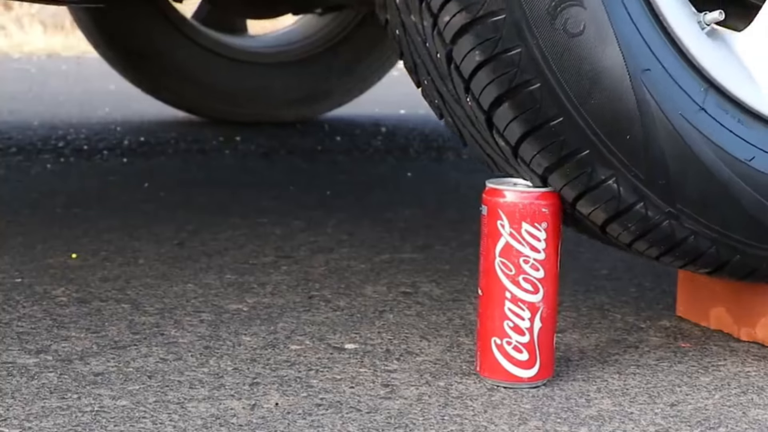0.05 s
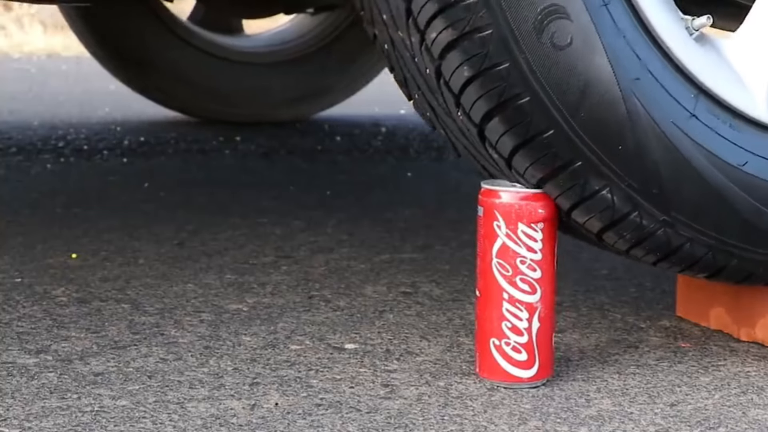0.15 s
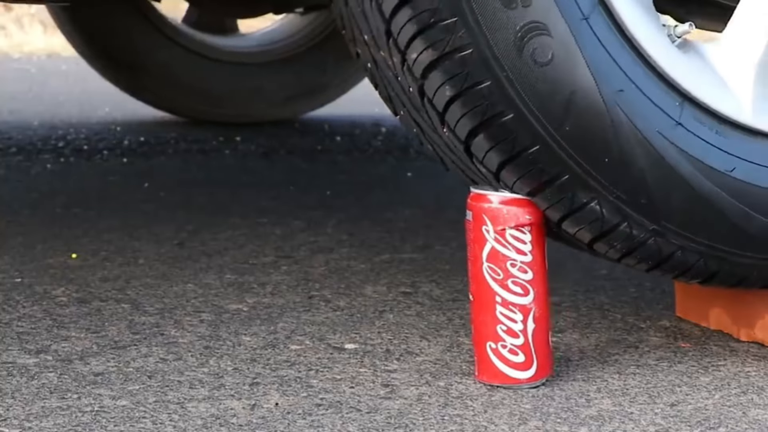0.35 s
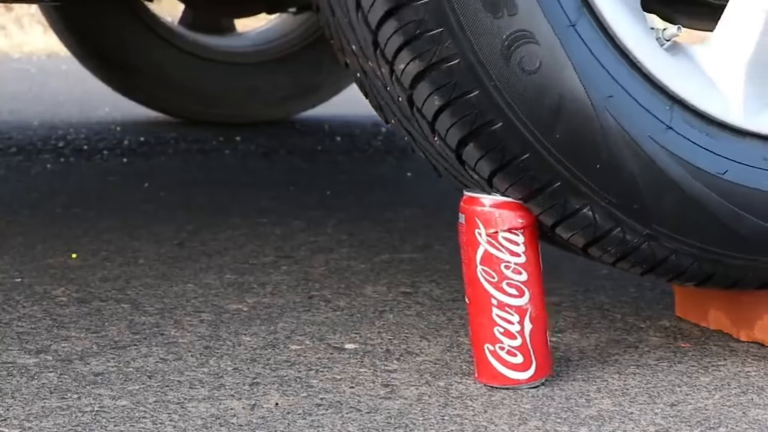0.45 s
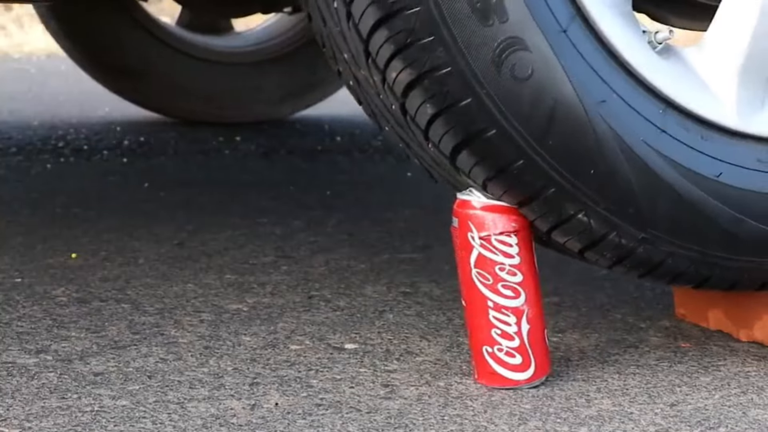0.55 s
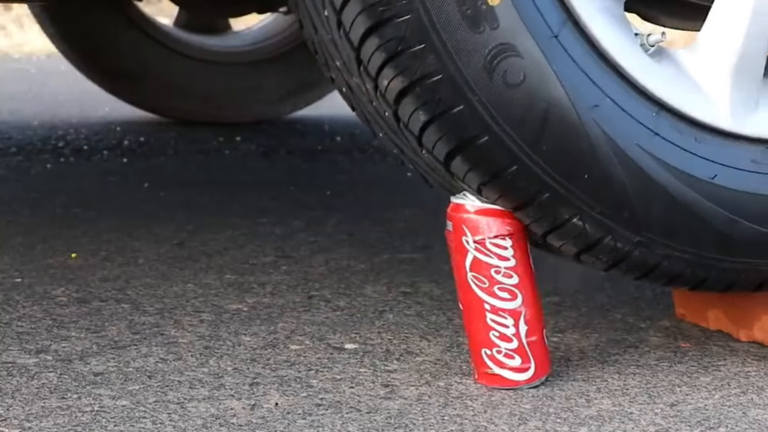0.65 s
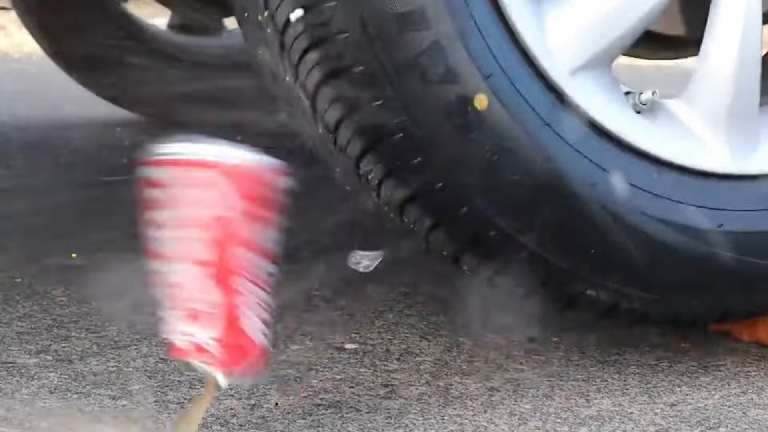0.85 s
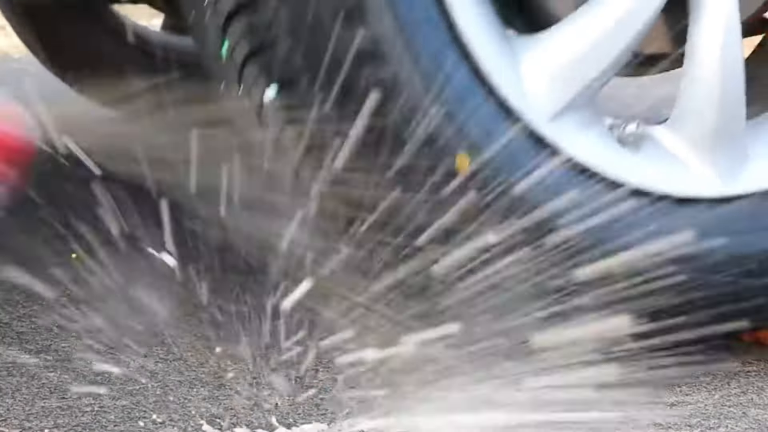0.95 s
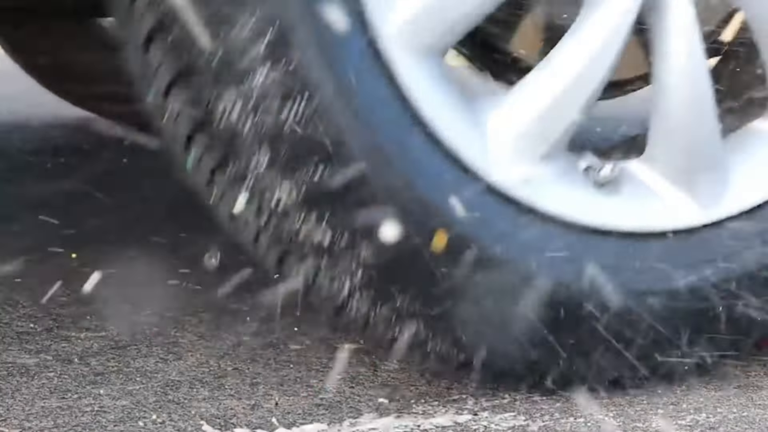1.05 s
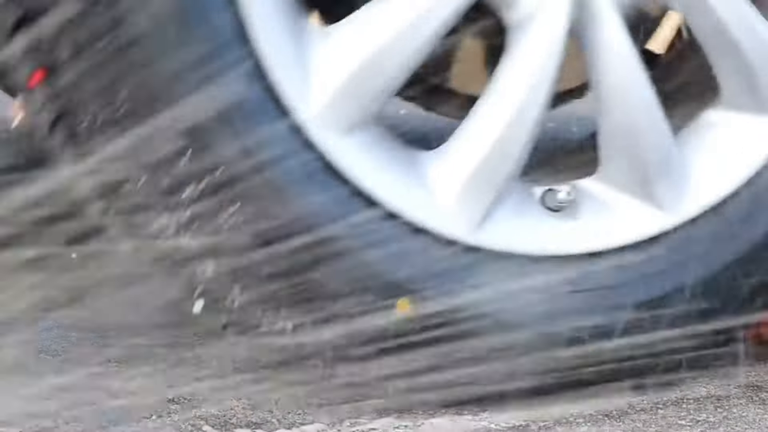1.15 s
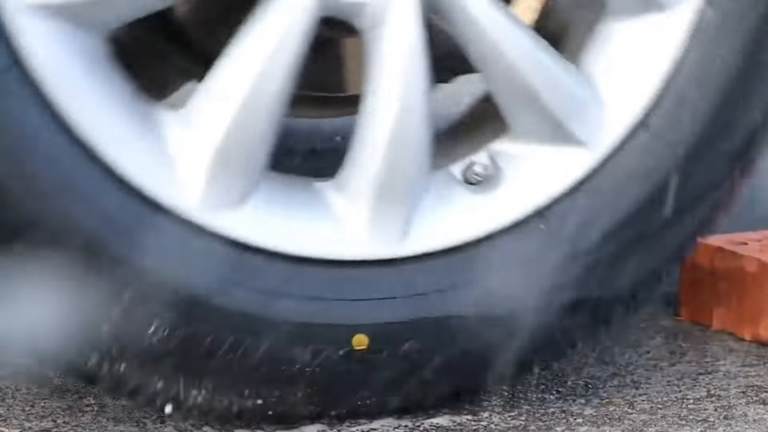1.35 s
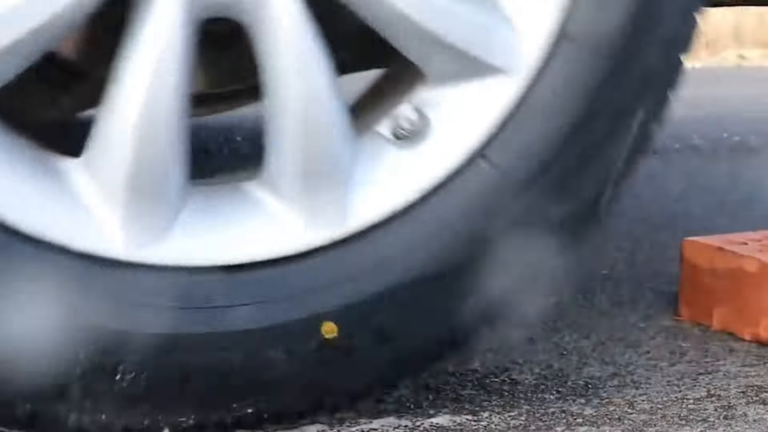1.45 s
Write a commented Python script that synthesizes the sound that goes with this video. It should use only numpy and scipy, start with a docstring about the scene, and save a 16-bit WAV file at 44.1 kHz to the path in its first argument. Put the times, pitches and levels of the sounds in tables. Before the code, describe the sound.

A full drink can is crushed by a slow car tyre on asphalt: faint ticks, hollow tinny snaps, then a violent double pop with gushing liquid, fine spray and two later sharp pops, heard very close outdoors.

```python
"""On asphalt, close to the microphone: a car tyre rolls onto a full drink can, over the car's soft rush.
The thin shell buckles in uneven snaps, each a tick, a hollow knock and a ring of many decaying modes.
Near 0.84 s it splits: shaped noise gushes out, with two sharp pressure pulses close together.
Slop and spray follow, with two more sharp pops and a last faint one as the tyre flattens the can.
Blows and pops leave a boom of low noise and cavity tones under the car."""
import sys
import numpy as np
from scipy import signal
from scipy.fft import rfft, irfft
from scipy.io import wavfile
from scipy.ndimage import uniform_filter1d

SR = 44100
rng = np.random.default_rng(int(sys.argv[2]) if len(sys.argv) > 2 else 0)


def dump_mix(stems):
    """Bounce the given channels to the path in sys.argv[1] as a 16-bit WAV at rate SR."""
    frames = np.atleast_2d(stems).T  # one column per channel
    limited = np.clip(frames, -1, 1)  # hard clip at full scale
    pcm = np.round(limited * 32767).astype(np.int16)
    wavfile.write(sys.argv[1], SR, pcm)


N = 66150
T = np.arange(N) / SR
EDGE_HZ = 15800  # upper limit of the shell's mode crowd and of the microphone's band


def amp(db):
    """Decibels to gain."""
    return 10 ** (np.asarray(db) / 20)


def unit(x):
    """Scales to rms 1."""
    return x / np.sqrt(np.mean(x ** 2) + 1e-20)


def read(points, hz):
    """Interpolates (Hz, value) points on a log-frequency axis."""
    f, value = np.transpose(points)
    return np.interp(np.log(hz + 1), np.log(f + 1), value)


def level(points):
    """Gain over time from (s, dB) points, at -120 dB before the first."""
    return amp(np.interp(T, *np.transpose(points), left=-120))


def fade(t60, t=T):
    """Exponential decay by 60 dB in t60 seconds."""
    return np.exp(-np.log(1000) * t / t60)


def rise(time_s):
    """Exponential approach to full level, with this time constant."""
    return 1 - np.exp(-T / time_s)


def add(mix, s, sound):
    """Mixes a sound in at time s."""
    part = mix[max(round(s * SR), 0):][:len(sound)]
    part += sound[:len(part)]


def noise(colour):
    """Noise of rms 1, its spectrum shaped by (Hz, dB) points."""
    spectrum = rfft(rng.standard_normal(N))
    gain = amp(read(colour, np.fft.rfftfreq(N, 1 / SR)))
    return unit(irfft(spectrum * gain, N))


def filtered(x, hz, kind, order=1):
    """Low-pass or high-pass, gentle at first order."""
    return signal.sosfilt(signal.butter(order, min(hz, SR / 2 - 1), kind, fs=SR, output="sos"), x)


def ring(modes, pitch=1, tilt_db=0):
    """Struck modes as decaying sines, tilted per octave about 400 Hz; neighbours start in opposite directions."""
    out = np.zeros(N)
    for k, (hz, db, t60) in enumerate(modes):
        gain = (-1) ** k * amp(db + tilt_db * np.log2(hz / 400))
        out += gain * fade(t60) * np.sin(2 * np.pi * hz * pitch * T)
    return out


# The dents, in order of time: start_s, knock_db, knock_pitch_factor, knock_tilt_db_per_octave,
# shell_db, shell_pitch_factor, shell_ring_length_factor, shell_tilt_db_per_octave,
# main_ring_hz, main_ring_boost_db, tick_db, swell_db, boom_db
BUCKLES = [(0.1485, -29.5, .88, -3, -41, 0.67, 0.67, -7.5, 3380, 28, -63, -69, -41),
           (0.2118, -12, .95, 4.5, -20, 1.07, 1.04, -0.76, 900, 9.5, -52, -40, -28.5),
           (0.2675, -30.5, 0.56, 0, -52, 0.9, .8, -15, 2500, 1, -66, -66, -51),
           (0.3520, 0, 1.0, -1, -6.5, 1.0, 0.88, 0.04, 4320, 6, -20, -19.5, -27.5),
           (0.3680, -19, 0.68, -2, -27.5, 1.0, 1.6, 2, 3500, 6, -38, -40, -34),
           (0.5590, -15.5, 1.05, 11.5, -0.5, 1.01, 0.89, 1.35, 2130, 5.5, -7.5, -9, -26),
           (0.8390, -15.5, 1.21, 3, -7.5, 1.08, 0.66, 7, 3480, -4, -9, -16.5, -21),
           (0.9958, -60, 0.56, -11, -25.5, 0.89, 0.63, 3, 2420, 0.5, -48, -34, -55),
           (1.0170, -47.5, 1.0, 13.5, -37, 1.4, 0.64, -14, 5400, 25, -52, -50, -44)]
# Modes of the liquid-filled body, before each dent's pitch and tilt: pitch_hz, level_db, t60_s
KNOCK = [(248.8, -15, 0.13), (373, 3, 0.024), (535.6, -2.5, 0.058), (890, -4, 0.012), (1067, -11, 0.036)]
KNOCK_RISE_S, TICK_T60_S = 0.00036, 0.018
# The wheel drops a little as the can gives way
THUD_S, THUD_HZ, THUD_DB, THUD_T60_S = 0.555, 45.7, -16.5, 0.05


def buckles():
    """Each dent snaps in: a bright tick, a hollow knock of the full can and the ring of its wall."""
    out = np.zeros(N)
    for (s, knock_db, knock_pitch, knock_tilt_db, shell_db, pitch, length, tilt_db,
         main_hz, boost_db, tick_db, swell_db, boom_db) in BUCKLES:
        wall, swell = shell(pitch, length, tilt_db, main_hz, boost_db)
        add(out, s - len(swell) / SR, amp(swell_db) * swell)
        add(out, s, amp(shell_db) * wall)
        knock = rise(KNOCK_RISE_S) * ring(KNOCK, knock_pitch, knock_tilt_db)
        add(out, s, amp(knock_db) * knock)
        tick = fade(TICK_T60_S) * rng.standard_normal(N)
        add(out, s, amp(tick_db) * tick + amp(boom_db) * boom())
    add(out, THUD_S, ring([(THUD_HZ, THUD_DB, THUD_T60_S)]))
    return out


# Upper level of the crowd of wall modes, before each dent's tilt and boost: pitch_hz, level_db
SHELL = [(100, -10.5), (600, 1), (900, 2), (1600, 2), (3000, 4.5), (5200, -3.5), (8000, -6), (11000, -15),
         (16000, -20.5)]
# Decay of the crowd, before each dent's length factor: pitch_hz, t60_s
SHELL_T60 = [(500, 0.091), (2500, 0.12), (5000, 0.097), (9000, 0.074), (15000, .06)]
# Strongest rings of the wall, before each dent's factors and the lift below: pitch_hz, level_db, t60_s
WALL = [(803, -2, 0.0468), (886, -6, 0.023), (1064.5, 4, 0.054), (1270, -23, 0.23), (1430, -4.5, 0.17),
        (1708, -3.5, 0.072), (1918, -14, 0.2), (2100, 3, 0.073), (2709, 8.5, 0.069), (2810, 7.5, 0.033),
        (2924, -6, 0.16), (3224, 4.5, 0.11), (3495, 3.5, 0.082), (3850, -11, .13), (4940, -1.5, 0.13),
        (5003, 5.5, 0.046), (5970, -13, 0.13)]
WALL_LIFT_DB = 4.5
CROWD_SPREAD_DB = 12  # crowd modes lie up to this far below SHELL
SWELL_T60_S = 0.049


def shell(pitch, length, tilt_db, main_hz, boost_db, octaves=0.41, count=380):
    """The wall's main rings in a crowd of modes redrawn for each dent: a ring-out and a swell into it."""
    place, size = rng.random((2, count))
    crowd_hz = ((np.arange(count) + 1 + place) / count) ** 1.3 * EDGE_HZ
    crowd_db = read(SHELL, crowd_hz) + CROWD_SPREAD_DB * (size - 1)
    crowd = np.transpose([crowd_hz, crowd_db, read(SHELL_T60, crowd_hz)])
    main = np.array(WALL) * [pitch, 1, 1] + [0, WALL_LIFT_DB, 0]
    hz, db, t60 = np.vstack([crowd, main]).T[:, :, None]
    phase, lead_phase = rng.random((2, len(hz), 1))

    away = np.log2(hz / main_hz)  # octaves from the main ring
    gain = amp(db + tilt_db * away + boost_db * np.exp(-(away / octaves) ** 2))
    gain = gain / np.sqrt(np.sum(gain ** 2) / 2)

    t = T[:SR // 5]
    out = (gain * fade(t60 * length, t) * np.sin(2 * np.pi * (hz * t + phase))).sum(0)
    t = T[:SR // 20]
    swell = fade(SWELL_T60_S, t) * (gain * np.sin(2 * np.pi * (hz * t + lead_phase))).sum(0)
    return out, swell[::-1]  # the reversed decay grows towards the dent


# Colour of the low tail: pitch_hz, level_db
BOOM = [(25, -20), (60, -4.5), (120, 0.5), (230, 3), (330, -12), (600, -10.5), (2000, -19.5), (5000, -25.5),
        (16000, -77.5)]
# Resonances of the air under the car: pitch_hz, level_db, t60_s
CAVITY = [(119.7, -7, 0.29), (255.3, -1, 0.16)]
BOOM_T60_S, BOOM_RISE_S = 0.29, 0.0041


def boom():
    """The low tail that a blow leaves between road and car: decaying noise and cavity tones."""
    return rise(BOOM_RISE_S) * (noise(BOOM) * fade(BOOM_T60_S) + ring(CAVITY))


# Bursts: start_s, pulse_db, pulse_width_s, echo_delay_s, splash_db, boom_db, swell_db
POPS = [(0.8495, -4, 0.00031, .0017, -21, -42, -48), (0.8801, 1, 0.00026, 0.0024, -17, -24, -14.5),
        (1.1268, 0, 0.000082, 0.0033, -11.5, -36, -27), (1.3274, -1.5, 0.00012, 0.00236, -14.5, -41.5, -33),
        (1.3956, -43, .0002, 0.0028, -24, -47, -51)]
# Reflections off wheel and body: multiple_of_echo_delay, share_of_pulse
POP_ECHOES = [(1, 1), (1.67, 0.67), (2, 0.23)]
# Colour of splash and swell: pitch_hz, level_db
SPLASH = [(40, -23), (150, 3), (350, -3.5), (700, 3), (1200, 2), (2500, -6), (6000, -9), (10000, -16.5),
          (16000, -35)]
POP_LOW_HZ, POP_BASS_HZ = 178, 79  # gentle and steep high-pass
ECHO_LOW_HZ, ECHO_HIGH_HZ = 328, 2200
SPLASH_T60_S, SPLASH_RISE_S, POP_SWELL_T60_S = 0.049, 0.0004, 0.04


def pops():
    """Trapped gas and liquid break out: a pressure pulse with close echoes, a splash, a boom, with a faint
    swell leading into each."""
    out = np.zeros(N)
    lead_s = 0.004  # room for the pulse to rise before its peak
    for s, pulse_db, width_s, echo_s, splash_db, boom_db, swell_db in POPS:
        pulse = filtered(np.exp(-abs(T - lead_s) / width_s), POP_LOW_HZ, "highpass")
        pulse = filtered(pulse, POP_BASS_HZ, "highpass", order=3)
        pulse = amp(pulse_db) * pulse / abs(pulse).max()
        add(out, s - lead_s, pulse)

        echo = filtered(filtered(pulse, ECHO_HIGH_HZ, "lowpass"), ECHO_LOW_HZ, "highpass")
        for multiple, share in POP_ECHOES:
            add(out, s - lead_s + multiple * echo_s, share * echo)

        swell = (noise(SPLASH) * fade(POP_SWELL_T60_S))[:SR // 30]
        add(out, s - len(swell) / SR, amp(swell_db) * swell[::-1])
        splash = noise(SPLASH) * fade(SPLASH_T60_S) * rise(SPLASH_RISE_S)
        add(out, s, amp(splash_db) * splash + amp(boom_db) * boom())
    return out


def spatter(colour, patchy_db, strands_db):
    """Rushing liquid: noise with wide, brief patches and narrow, ringing strands."""
    z = signal.stft(noise(colour), nperseg=512)[2]
    wide, narrow = rng.standard_normal((2,) + z.shape)
    # axis 0 is frequency, axis 1 is time
    patches = unit(uniform_filter1d(uniform_filter1d(wide, size=16, axis=0), size=4, axis=1))
    strands = unit(uniform_filter1d(uniform_filter1d(narrow, size=2, axis=0), size=16, axis=1))
    uneven = z * amp(patchy_db * patches + strands_db * strands)
    return unit(signal.istft(uneven, nperseg=512)[1][:N])


# The gush from the split: time_s, level_db
JET = [(.80, -69), (.822, -31), (.835, -21.5), (.839, -9), (.847, -6), (.853, -14), (.875, -22), (.90, -80),
       (.96, -67), (1.05, -68)]
# Its colour: pitch_hz, level_db
JET_COLOUR = [(60, -38), (300, 2.5), (700, 1), (1500, -7.5), (3200, -0.5), (5500, -2), (8500, -9.5),
              (11000, -14.5), (16000, -9)]
# The can crumples and liquid slops out: time_s, level_db
SLOP = [(.81, -59), (.84, -37), (.87, -16), (.895, -16.5), (.91, -23.5), (.925, -23.5), (.95, -35.5),
        (.98, -40.5), (.997, -43), (1.03, -52), (1.08, -50.5), (1.12, -56), (1.15, -34.5), (1.22, -56),
        (1.30, -56), (1.37, -37.5), (1.395, -35), (1.44, -37.5), (1.5, -47)]
# Its colour: pitch_hz, level_db
SLOP_COLOUR = [(40, -30), (130, -0.5), (230, -5.5), (360, -7), (550, -1), (1000, 1.5), (1700, -2),
               (2400, -6.5), (4200, -7.5), (6500, -23.5), (16000, -24.5)]
# Fine spray: time_s, level_db
SPRAY = [(.85, -56), (.89, -39), (.94, -35), (.975, -42), (1.0, -37.5), (1.025, -34.5), (1.08, -52.5),
         (1.115, -55), (1.15, -36.5), (1.23, -34.5), (1.27, -40), (1.305, -45.5), (1.35, -36), (1.38, -35),
         (1.45, -36), (1.5, -29.5)]
# Its colour: pitch_hz, level_db
SPRAY_COLOUR = [(200, -32.5), (1200, -7.5), (2500, 1), (4200, 1), (6000, 4), (8000, -3), (11000, -7),
                (16000, -6.5)]


def drink():
    """Escaping liquid as three uneven noises: the first gush, the duller slop and the fine spray."""
    gush = level(JET) * spatter(JET_COLOUR, patchy_db=3.5, strands_db=0)
    slop = level(SLOP) * spatter(SLOP_COLOUR, patchy_db=2.0, strands_db=4.5)
    spray = level(SPRAY) * spatter(SPRAY_COLOUR, patchy_db=2.4, strands_db=1.5)
    return gush + slop + spray


SQUEAK_S, SQUEAK_LENGTH_S, SQUEAK_DB = 0.45, 0.051, -43
SQUEAK_HZ, SQUEAK_RISE_HZ_PER_S = 3600, 4500


def squeak(waver=0.015):
    """Metal slips on the rubber tread: a faint, rising tone with a random waver in pitch."""
    t = np.clip(T - SQUEAK_S, 0, SQUEAK_LENGTH_S)
    drift = unit(uniform_filter1d(rng.standard_normal(N), size=60))
    hz = (SQUEAK_HZ + SQUEAK_RISE_HZ_PER_S * t) * (1 + waver * drift)
    envelope = np.sin(np.pi * t / SQUEAK_LENGTH_S)
    return amp(SQUEAK_DB) * envelope * np.sin(2 * np.pi * np.cumsum(hz) / SR)


# Colour of the running car: pitch_hz, level_db
FLOOR = [(25, -29), (60, 1), (150, -2), (400, -0.5), (800, -2.5), (1600, -10.5), (3500, -16), (6000, -27),
         (9000, -34), (16000, -41.5)]
# Its level: time_s, level_db
FLOOR_LEVEL = [(0, -51.5), (.15, -53.5), (.45, -51), (.75, -48.5), (1.5, -53)]
# A low drone that swells after the blows: time_s, level_db
DRONE = [(0, -66), (.2, -76), (.28, -44), (.4, -57), (.52, -51), (.64, -42), (.72, -55), (.85, -47.5),
         (.95, -37), (1.02, -36.5), (1.1, -46), (1.2, -66), (1.5, -78)]
HUM_HZ, HUM_DB, DRONE_HZ = 385, -56.5, 200


def car():
    """The car behind it all: a soft rush of shaped noise, a steady hum and a drone of changing level."""
    rush = level(FLOOR_LEVEL) * noise(FLOOR)
    hum = amp(HUM_DB) * np.sin(2 * np.pi * HUM_HZ * T)
    drone = level(DRONE) * np.sin(2 * np.pi * DRONE_HZ * T)
    return rush + hum + drone


def scene():
    """Everything reaches both channels alike."""
    return np.tile(buckles() + pops() + drink() + squeak() + car(), (2, 1))


CLIP_KNEE = 3.3  # higher bends later and harder


def record(dry):
    """The close microphone: the loudest peaks overload softly, then a low-pass limits the band."""
    clipped = dry / (1 + abs(dry) ** CLIP_KNEE) ** (1 / CLIP_KNEE)
    band = signal.firwin(511, EDGE_HZ, window=("kaiser", 9), fs=SR)
    return signal.oaconvolve(clipped, band[None], "same")


dry = scene()
out = record(dry)
dump_mix(out)
```